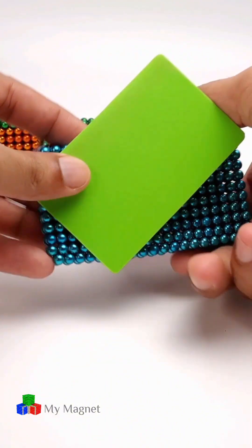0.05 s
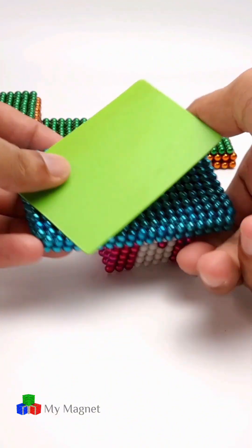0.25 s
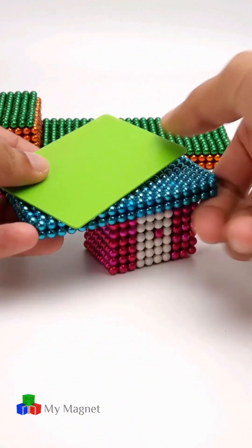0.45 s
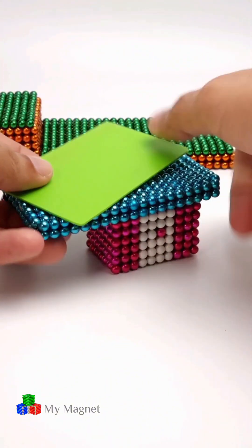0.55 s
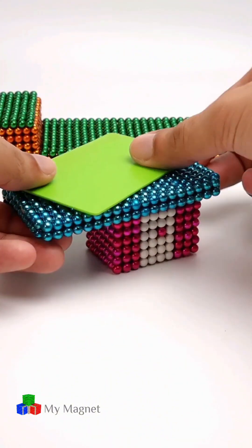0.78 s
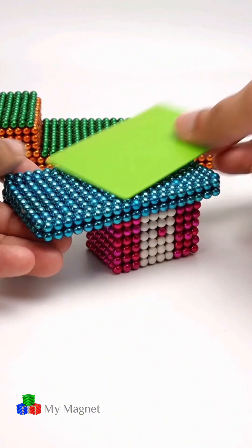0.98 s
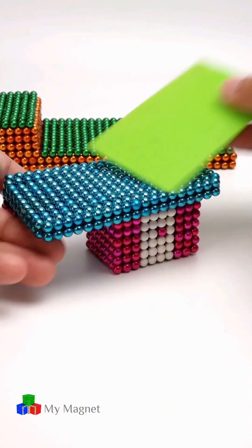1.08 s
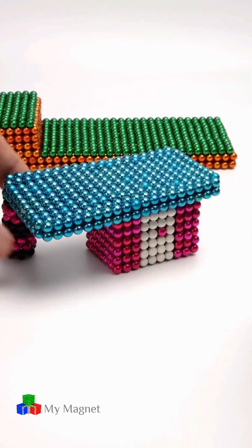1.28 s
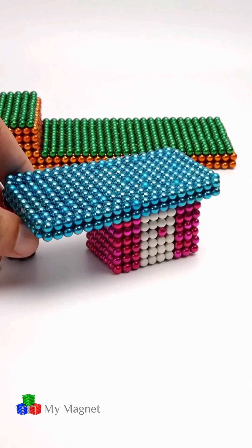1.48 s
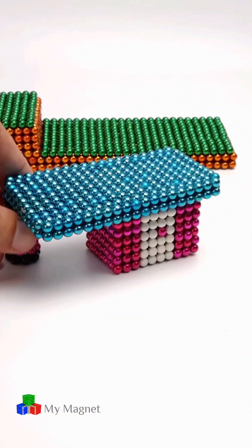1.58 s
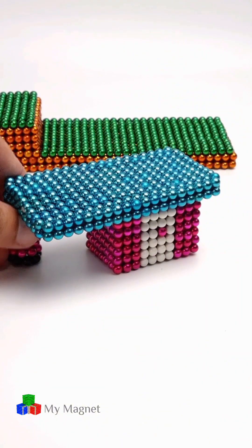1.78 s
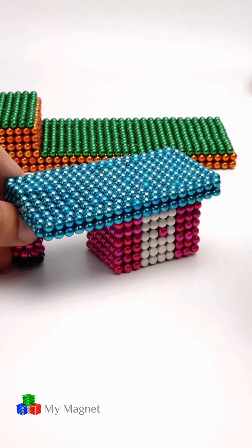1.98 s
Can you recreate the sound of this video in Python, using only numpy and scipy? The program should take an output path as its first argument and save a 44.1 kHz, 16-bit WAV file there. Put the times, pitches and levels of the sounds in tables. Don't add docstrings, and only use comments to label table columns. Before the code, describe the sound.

Magnetic steel balls snap together in a loud, rattling low clack, then a duller settling clunk; a plastic card snaps off with a brighter click and brief scrape, then a crisp metallic click, close microphone, reverberant room.

```python
import sys
import numpy as np
from scipy import signal
from scipy.fft import rfft, irfft
from scipy.io import wavfile
from scipy.ndimage import uniform_filter1d

SR = 44100
rng = np.random.default_rng(int(sys.argv[2]) if len(sys.argv) > 2 else 0)


def master(y):
    cut = np.clip(np.atleast_2d(y).T, -1, 1)
    pcm = np.round(cut * 32767)
    wavfile.write(sys.argv[1], SR, pcm.astype(np.int16))


def gain_from_db(level_db):
    decades = np.asarray(level_db, float) / 20
    return 10 ** decades


N = 90404
OPPOSITE = np.array([[1], [-1]])


def unit(x):
    return x / np.max(np.abs(x))


def lowpass(x, order, hz):
    return signal.sosfilt(signal.butter(order, hz, fs=SR, output="sos"), x)


def highpass(x, order, hz):
    return signal.sosfilt(signal.butter(order, hz, "high", fs=SR, output="sos"), x)


def colour(x, points):
    p = np.array(points, float)
    hz = np.maximum(np.fft.rfftfreq(2048, 1 / SR), 1)
    db = np.interp(np.log(hz), np.log(p[:, 0]), p[:, 1], left=p[0, 1] - 25, right=p[-1, 1] - 25)
    cepstrum = irfft(np.log(gain_from_db(db)))
    cepstrum[1:1024] *= 2
    cepstrum[1025:] = 0
    response = irfft(np.exp(rfft(cepstrum)))
    return signal.fftconvolve(x, response)[:len(x)]


def ring(x, peaks):
    t = np.arange(SR // 4) / SR
    h = np.zeros(len(t))
    for k, (hz, width, db) in enumerate(peaks):
        decay = np.exp(-np.pi * width * t)
        h += (-1) ** k * gain_from_db(db) * width * decay * np.sin(2 * np.pi * hz * t)
    return signal.fftconvolve(x, unit(h))[:len(x)]


def walk(rate_hz):
    k = int(SR / rate_hz)
    held = np.repeat(rng.standard_normal(N // k + 1), k)
    return 0.57 * uniform_filter1d(uniform_filter1d(held, k), k)[:N]


def rattle(snaps, shower):
    contacts_per_s, scatter_db = 6000, 1.8
    t, env, first = np.arange(N) / SR, np.zeros(N), np.zeros(N)
    for s, db, length in snaps:
        env += gain_from_db(db) * (t > s) * np.exp(-np.maximum(t - s, 0) / length)
        first[int(s * SR)] -= gain_from_db(db)
    u = rng.random((3, N))
    hits = (u[0] < contacts_per_s / SR) * np.sign(u[1] - 0.5)
    strength = gain_from_db(-scatter_db * (-1.5 + np.log(u[2] + 1e-9)))
    return first + shower * env * hits * strength


def lattice(snaps, peaks, crack, ring_db, crack_db, shower):
    x = rattle(snaps, shower)
    click = np.eye(1, 2048)[0]
    crack_peak = np.max(np.abs(colour(click, crack)))
    return gain_from_db(ring_db) * ring(x, peaks) + gain_from_db(crack_db) * colour(x, crack) / crack_peak


def room_floor():
    # (frequency [Hz], density [dB])
    rumble_colour = [(18, -56), (30, -22.5), (50, -4.5), (75, -8), (128, -10), (203, -21), (490, -47.5),
                     (1200, -52.5), (1560, -66), (2640, -120)]
    hiss_colour = [(300, -8), (1200, 0.5), (6000, 2), (10000, 3), (16000, -12)]
    hush_db, stir_s = -9, 0.22
    rumble = colour(rng.standard_normal(N), rumble_colour) * gain_from_db(3.5 * walk(22))
    hush = np.clip((stir_s - np.arange(N) / SR) / 0.088, 0, 1)
    rumble = rumble / np.std(rumble) * gain_from_db(hush_db * hush)
    mid = colour(rng.standard_normal(N), hiss_colour)
    side = colour(rng.standard_normal(N), hiss_colour)
    hiss = np.array([mid + 0.6 * side, mid - 0.47 * side])
    return gain_from_db(-56.5) * rumble + gain_from_db(-81) * hiss / np.std(mid)


def hall(x):
    # (delay [s], level [dB])
    echoes = [(.052, -20), (.063, -23.5), (.076, -31), (.081, -34), (.092, -37), (.101, -39.5),
              (.108, -31.5), (.126, -36.5), (.153, -27)]
    t60_s, top_t60_s, early_t60_s = 1.185, 0.97, 0.24
    delay_s, rise_s = 0.032, 0.06
    t = np.arange(N) / SR
    flutter = gain_from_db(6 * walk(170))
    late = np.clip((t - delay_s) / rise_s, 0, 1) * flutter
    x = highpass(x, 1, 325)
    out = []
    for _ in range(2):
        n = rng.standard_normal(N)
        low = lowpass(n, 2, 2500)
        tail = low * gain_from_db(-60 * t / t60_s) + (n - low) * gain_from_db(-60 * t / top_t60_s)
        h = (late * tail + n * gain_from_db(5 - 60 * t / early_t60_s)) / 100
        for s, db in echoes:
            h[int(s * SR)] += gain_from_db(db + 5) * np.sign(rng.standard_normal())
        out.append(signal.fftconvolve(x, h)[:N])
    side = gain_from_db(-1) * highpass(out[1], 3, 330)
    return out[0] + side * OPPOSITE


def table_bumps():
    # (time [s], level [dB], pitch [Hz], length [s])
    knocks = [(.232, -13, 325, 0.038), (0.236, -16.5, 131.7, 0.039), (0.259, -16.5, 48.8, 0.03),
              (0.375, -25, 116.4, 0.027), (0.401, -20.5, 129.9, 0.097), (0.4407, -5.5, 132.7, 0.006),
              (0.47, -20, 124, 0.041), (0.513, -18, 133, 0.019), (.54, -22.5, 125, 0.0085),
              (0.655, -28, 61, 0.026), (0.814, -39.5, 59.6, 0.071), (.812, -33, 300, 0.015),
              (.820, -32.5, 520, 0.0066), (.826, -34, 330, .012), (.834, -33.5, 700, 0.01),
              (.842, -31.5, 269, .014), (.862, -43.5, 244, 0.012), (.85, -40.5, 123, 0.028),
              (0.98, -39, 69.4, 0.032), (1.421, -45.5, 75.2, 0.034), (1.619, -48, 284, 0.04),
              (1.6463, -23.5, 320, 0.026), (1.656, -21.5, 297, 0.015), (1.6677, -23, 242, 0.0097),
              (1.686, -23.5, 244, 0.01), (1.655, -34, 75.2, 0.039), (1.80, -42.5, 170, 0.031),
              (1.885, -43.5, 53.7, 0.031), (1.99, -43.5, 58.6, 0.052), (1.713, -28, 200.4, 0.0092),
              (1.742, -35.5, 63.6, 0.033), (1.78, -32, 278, 0.021)]
    t, out = np.arange(N) / SR, np.zeros(N)
    for s, db, hz, length in knocks:
        a = np.maximum(t - s, 0) / length
        out -= gain_from_db(db) * 45 * a ** 2 * np.exp(-5 * a) * np.sin(2 * np.pi * hz * (t - s))
    return out


def card_scrape():
    # (time [s], level [dB], rattle length [s], pitch [Hz])
    catches = [(.9765, -20, .0015, 1800), (.9555, -24, .003, 1700), (.9605, -27, .003, 1750),
               (.9645, -27, .005, 1800), (.9860, -29, .005, 2000), (.9940, -28, .004, 1500),
               (1.0020, -28, .003, 1950), (1.0060, -22, .005, 1480), (1.0200, -25, .006, 1480)]
    # (frequency [Hz], width [Hz], level [dB])
    shared_modes = [(973, 10, 4), (1488, 30, -1.5), (2040, 43, 2)]
    out = np.zeros(N)
    for s, db, length, hz in catches:
        scraped = rattle([(s, db, length)], 0.24)
        rung = ring(scraped, [(hz, 130, 0), *shared_modes])
        out += ring(rung, [(hz, 500, 0), (1000, 300, -9)])
    return gain_from_db(-30) * out


def contact_ticks():
    # (time [s], level [dB])
    crests = [
        (0.2396, -29),
        (0.4435, -39),
        (.8086, -31.5),
        (0.8084, -34),
        (1.7445, -22),
        (1.7482, -27.5),
        (1.7489, -29.5),
    ]
    ticks = np.zeros(N)
    for s, db in crests:
        ticks[int(s * SR)] -= gain_from_db(db)
    return lowpass(gain_from_db(3) * ticks, 2, 10000)


def card_snap():
    # (time [s], level [dB], rattle length [s])
    snaps = [(.8081, 0, .0003), (.8092, 0, .0004), (.8047, -32, .001), (.8061, -11, .0012),
             (.8103, -9, .0006), (.8113, -7, .0006), (.8122, -6, .0008), (.8133, -10, .001),
             (.8187, -22, .001)]
    # (frequency [Hz], width [Hz], level [dB])
    modes = [(265, 110, -3), (660, 48, -12.5), (833, 13, -5), (1002.5, 11, -7.5), (1462, 20, 4),
             (1783, 290, -1), (2056, 130, 1.5), (2542, 200, -9.5), (3140, 110, -20.5), (3844, 360, -5),
             (4500, 260, -13.5), (4812, 480, -11.5), (5800, 260, -4)]
    # (frequency [Hz], density [dB])
    crack = [(200, -21.5), (310, -8), (480, -21), (1000, -9.5), (1900, -22.5), (3050, -29.5), (4000, -8.5),
             (4800, -11), (5300, -15), (5900, -13.5), (7200, -39.5)]
    return lattice(snaps, modes, crack, ring_db=-11, crack_db=-8, shower=0.28)


def pillar_snap():
    # (time [s], level [dB], rattle length [s])
    snaps = [(1.7453, -6, .0006), (1.7460, 1, .0008), (1.7473, -1, .0008), (1.7484, -5, .001),
             (1.7825, -17, .0015), (1.7833, -20, .002), (1.7578, -14, .003), (1.7543, -10, .0025),
             (1.7170, -13, .004), (1.7185, -15, .005), (1.7250, -14, .004), (1.731, -20, .004),
             (1.736, -20, .008), (1.751, -15, .002), (1.7620, -9, .004), (1.7675, -15, .004),
             (1.774, -22, .006), (1.793, -24, .003), (1.8256, -24, .003)]
    # (frequency [Hz], width [Hz], level [dB])
    modes = [(1065, 300, 2), (1660, 340, 5.5), (2200, 450, -5.5), (2727, 31, 13), (2837, 11, 3),
             (3520, 50, 4.5), (3700, 68, -2), (4220, 42, -9.5), (4780, 47, -4), (4940, 43, -2.5),
             (5380, 30, -2), (5830, 240, -4), (6000, 64, -1.5), (6095, 200, -2)]
    # (frequency [Hz], density [dB])
    crack = [(120, -28), (200, -3.5), (1140, -7), (1250, -29), (1710, -11), (2170, -3.5), (2480, -1),
             (6110, -5.5), (7200, -22), (9360, -61), (15800, -120)]
    return lattice(snaps, modes, crack, ring_db=-16.5, crack_db=-5.5, shower=0.39)


def dull(x):
    return signal.sosfilt(signal.ellip(6, 0.5, 45, 3250, fs=SR, output="sos"), x)


def slab_settling():
    # (time [s], level [dB], rattle length [s])
    snaps = [(.4415, -1, .0006), (.4453, -8, .001), (.4480, -15, .001), (.6228, -24, .004),
             (.4372, -10, .002), (.4388, -11, .002), (.4400, -13, .001), (.456, -15, .004),
             (.475, -23, .012), (.549, -28, .004), (.5985, -36, .004), (.649, -31, .004), (.687, -37, .004),
             (.702, -36, .004)]
    # (frequency [Hz], width [Hz], level [dB])
    modes = [(320, 22, 3.5), (435, 16, -2.5), (492, 35, -3.5), (600, 83, 0), (793, 27, 0), (974, 27, -15),
             (1067, 32, -12.5), (1590, 73, -25), (1770, 20, -19.5), (1845, 120, -16.5), (2194, 27, -15),
             (2423, 100, -22), (2570, 51, -23.5), (2824, 40, -25.5)]
    # (frequency [Hz], density [dB])
    crack = [(150, -37.5), (250, -1.5), (802, -6), (1440, -36), (1880, -24), (2390, -25), (3300, -43),
             (4290, -69.5), (7260, -120)]
    return dull(lattice(snaps, modes, crack, ring_db=-6.5, crack_db=-9, shower=0.25))


def slab_shimmer():
    high = signal.ellip(6, 0.5, 45, 5078, "high", fs=SR, output="sos")
    contacts = [(0.2257, -22, 0.018), (0.2385, -22, 0.001), (0.25, -32, 0.012)]
    return signal.sosfilt(high, rattle(contacts, 0.3))


def slab_snap():
    # (time [s], level [dB], rattle length [s])
    snaps = [(.2279, -4.5, 0.0014), (.2295, -7.5, 0.00033), (.2302, -7.5, 0.00046), (.2317, -12.5, 0.00046),
             (.2328, -5.5, 0.00033), (.2338, -6.5, .002), (.2360, -10.5, 0.00081), (.2390, -0.5, 0.00067),
             (.2429, -7, 0.00067), (.2452, -5.5, 0.0015)]
    # (frequency [Hz], width [Hz], level [dB])
    modes = [(319.2, 54, 9.5), (439, 27, -4.5), (495, 29, -13.5), (600, 3.3, -15), (794, 40, 3.5),
             (854, 10, -13), (1178, 14, -9), (1564, 28, -8.5), (1874, 30, -8), (2030, 80, -23),
             (2760, 65, -29), (2780, 17, -33.5)]
    # (frequency [Hz], density [dB])
    crack = [(200, -14.5), (332, 0.5), (800, -18.5), (1400, -18.5), (2400, -20.5), (3250, -32), (3600, -53)]
    clack = lattice(snaps, modes, crack, ring_db=-9.5, crack_db=-6.5, shower=0.3)
    return dull(clack) + slab_shimmer()


def scene():
    slab, settle, card, pillar = slab_snap(), slab_settling(), card_snap(), pillar_snap()
    scrape, low, ticks = card_scrape(), table_bumps(), contact_ticks()
    top = signal.ellip(8, 0.5, 75, 6865, fs=SR, output="sos")
    dry = signal.sosfilt(top, slab + settle + card + scrape + pillar) + ticks
    send = gain_from_db(-7) * slab + gain_from_db(-7.5) * (settle + card + pillar) + gain_from_db(-9.5) * scrape
    send = signal.sosfilt(top, send) + gain_from_db(-10.5) * low + gain_from_db(-7.5) * ticks
    bump_width = gain_from_db(-40.5) * np.roll(low, shift=150) * OPPOSITE
    return dry + low + hall(send) + room_floor() + bump_width


def band_limit(x):
    return signal.sosfilt(signal.butter(12, 16300, fs=SR, output="sos"), x)


def record(dry):
    drive_db, ceiling, grit_db = 1.5, 0.87, -37
    n = rng.standard_normal(dry.shape)
    grit = lowpass(n[0] + 0.45 * n[1] * OPPOSITE, 1, 4000)
    x = highpass(dry, 5, 38)
    x = np.clip(gain_from_db(drive_db) * x, -ceiling, ceiling)
    loudness = uniform_filter1d(np.minimum(np.abs(dry), 0.05), size=1500)
    x = x + gain_from_db(grit_db) * grit * loudness ** 0.87
    return band_limit(x)


dry = scene()
out = record(dry)
master(out)
```